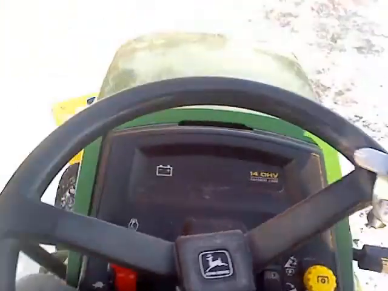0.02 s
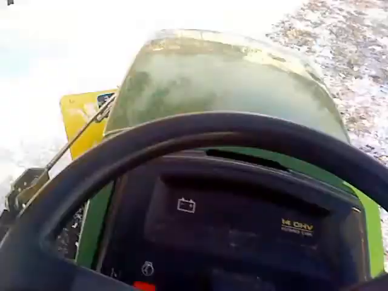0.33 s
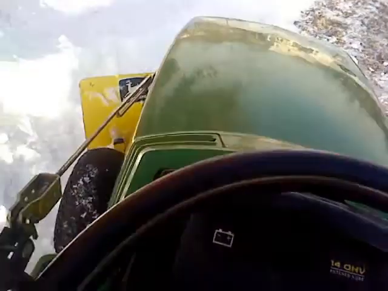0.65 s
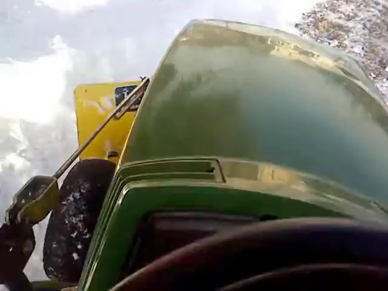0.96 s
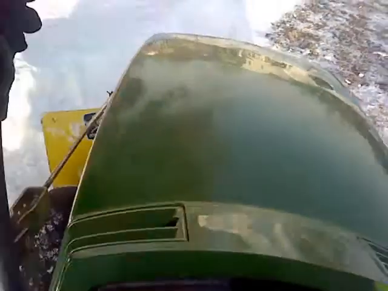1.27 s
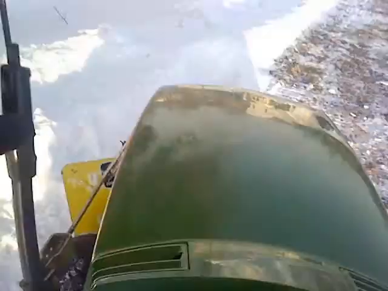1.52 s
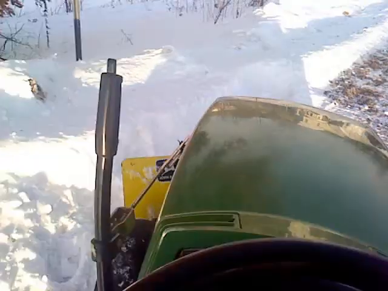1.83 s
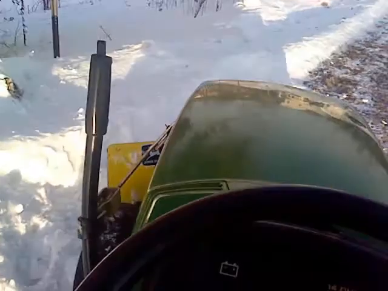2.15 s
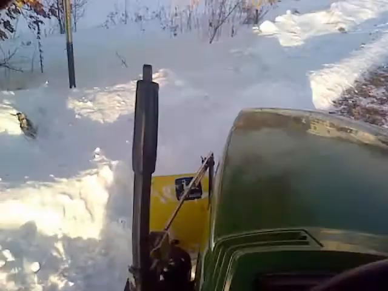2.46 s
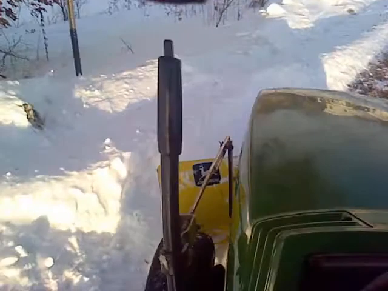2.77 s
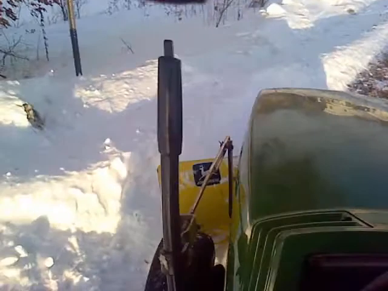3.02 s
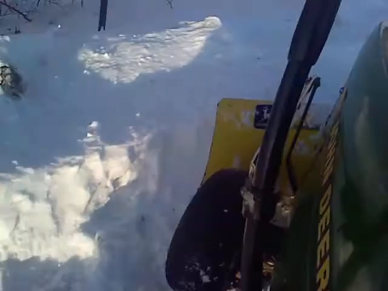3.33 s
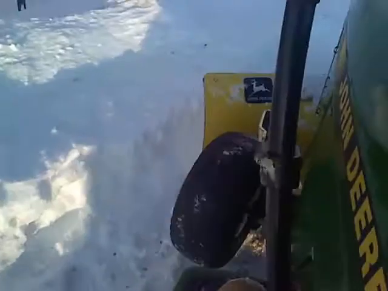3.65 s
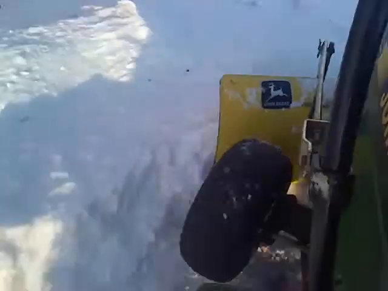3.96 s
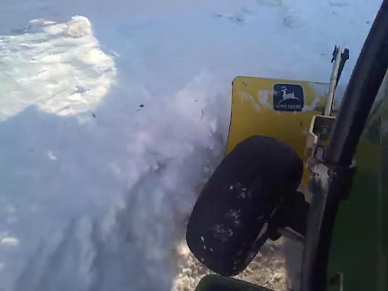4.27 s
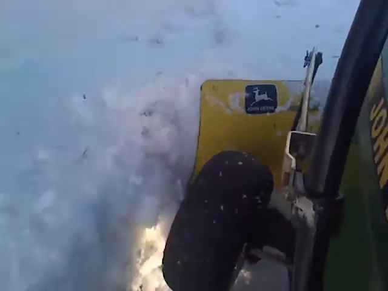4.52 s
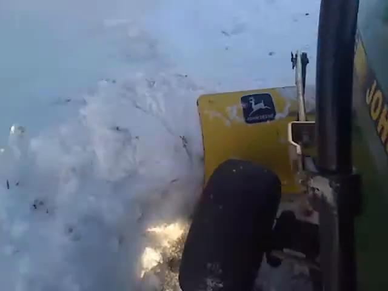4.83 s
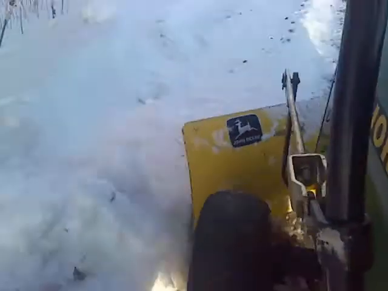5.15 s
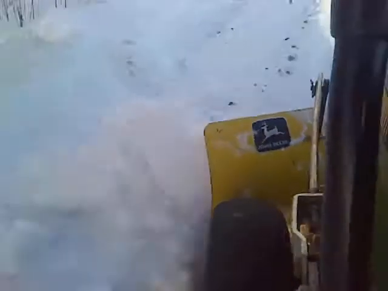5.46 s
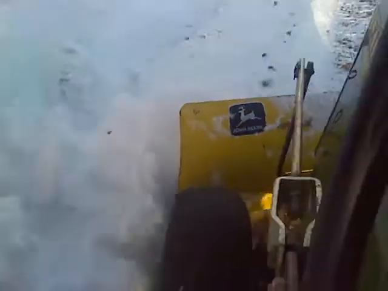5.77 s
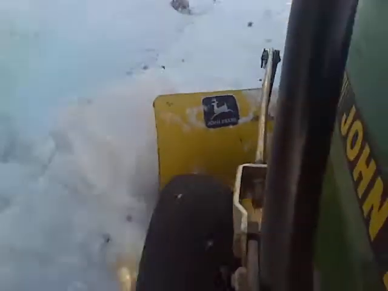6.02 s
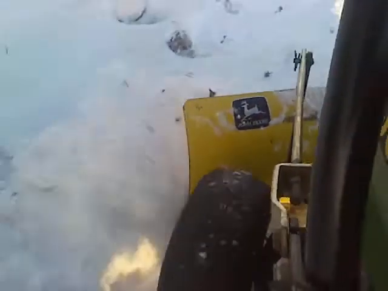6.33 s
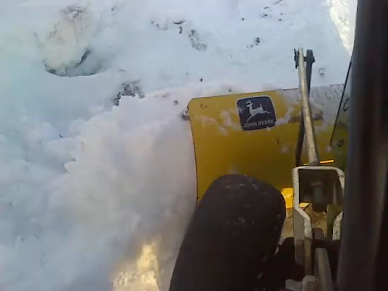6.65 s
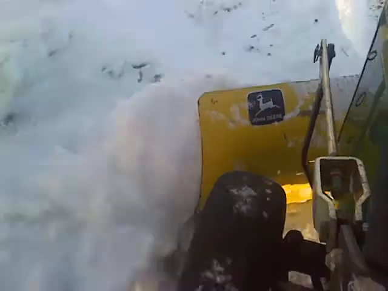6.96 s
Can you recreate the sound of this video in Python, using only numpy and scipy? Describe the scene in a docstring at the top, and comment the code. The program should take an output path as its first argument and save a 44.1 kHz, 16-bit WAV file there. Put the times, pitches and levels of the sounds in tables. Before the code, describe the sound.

Steady single-cylinder lawn tractor running with gear whine and clatter, straining briefly while its snowthrower churns snow with growing hiss and hollow booms.

```python
"""Lawn tractor throwing snow

A single-cylinder tractor with a front snowthrower, close up from the seat: the microphone starts over
the hood, then leans out and down beside the wheel. The exhaust thuds once every two crank turns and
barks when the load drags the speed down; gears whine and valves clatter. Snow hisses through the auger
and lumps boom in the chute. The narrow-band microphone overloads on the peaks."""
import sys
import numpy as np
from scipy import signal
from scipy.fft import rfft, irfft, next_fast_len
from scipy.io import wavfile
from scipy.ndimage import map_coordinates

SR = 44100
rng = np.random.default_rng(int(sys.argv[2]) if len(sys.argv) > 2 else 0)


def transcribe(u):
    """Save the signal u as a 16-bit wav file named by the first command-line argument.

    u: samples, shape (n,) or (channels, n), limited to [-1, 1]; the rate is SR.
    q: integer samples, one column per channel.
    """
    v = np.clip(np.atleast_2d(u).T, -1, 1)
    q = np.round(v * 32767).astype(np.int16)
    wavfile.write(sys.argv[1], SR, q)


N = 308259

# The speed the governor holds. Each row: time in seconds, firings per second.
GOVERNED_SPEED = [(0, 27.239), (2.3, 27.128), (3.8, 27.147), (6.99, 26.945)]
# Packed snow bogs the engine down.
# Each row: slowest moment in seconds, firings per second lost, build-up in seconds.
BOGS = [(2.948, 2.446, .204), (4.479, .324, .251), (4.949, 1.978, .206), (6.469, .415, .38)]
# Valve and piston knocks. Each row: place in the engine cycle from 0 to 1, relative level in dB.
KNOCKS = [(.0, -1), (.19, -2), (.49, -0.5), (0.641, -5.5), (.81, -1.5)]
# Snow entering the auger; it sets hiss, clatter and effort. Each row: time in seconds, level in dB.
SNOW_FEED = [(0, -31), (1.12, -29.5), (1.22, -26), (1.8, -33.5), (2.55, -30), (2.87, -32.5), (3.1, -26),
             (3.55, -27), (3.75, -22), (4.0, -25.5), (4.25, -20.5), (4.6, -24.5), (4.8, -20.5), (5.35, -17),
             (5.55, -20.5), (5.7, -15.5), (6.0, -16), (6.99, -15)]

# Whine over the hood, beside the wheel and from the snowthrower drive.
# Each row: multiple of the firing rate, relative level in dB.
HOOD_LINES = [(15, -12), (18, -13), (19, -13), (20, -5), (22, -9), (24, -6), (25, -8), (26, -10), (27, -13),
              (28, 0), (30, -5), (32, -8), (33, -14), (34, -3), (36, -11), (38, -11), (40, -5), (42, -8),
              (43, -11), (44, -7), (46, -10), (48, -12), (50, -14), (54, -7), (57, -13), (58, -13),
              (60, -13)]
WHEEL_LINES = [(14, -5), (16, -6), (17, -9), (20, -7), (21, -9), (24, 0), (30, -10), (36, 1), (40, -4),
               (42, -6), (50, -7), (54, -5), (56, -6)]
DRIVE_LINES = [(20, -11), (21, -7), (22, -5), (26, -12), (28, -8), (30, -3), (32, -9), (34, 1), (40, -8),
               (44, -4), (50, -8), (52, -9), (66, -9), (79, -8)]
MESH_LINES, MESH_DB = [(30, -10.5), (34, -2)], -23  # the drive's strongest lines and their level

# Bodies that ring. Each row: resonance in Hz, width in Hz, relative level in dB.
MUFFLER_MODES = [(186, 12, -1), (220.4, 23.6, 7), (260, 55, -1.5), (298, 27, -13.5), (387, 8.3, -12)]
SHEET_METAL_MODES = [(1557, 30, 4.5), (1716, 27, -2.5), (2087, 63, -7.5), (2380, 54, -17.5),
                     (3195, 270, -15.5)]
CHUTE_MODES = [(335, 110, -5), (381, 32, 0)]
AUGER_HOUSING_MODES = [(1300, 830, -6.5), (2250, 110, -3), (2160, 170, 2.5), (3440, 600, -10.5)]

# A few firings that knock harder than the rest, snow lumps in the chute and ice cracking on the housing.
# Each row: start in seconds, relative peak level in dB.
HARD_KNOCKS = [(1.488, -19), (2.074, -17), (2.185, -18), (2.337, -17), (2.706, -18), (3.683, -15),
               (4.05, -16)]
LUMPS = [(4.3, -8.5), (4.43, -9), (4.964, -10), (5.04, 2), (5.274, -4.5), (5.686, -7.5), (5.853, -7.5),
         (6.195, -9.5), (6.465, -8.5), (6.592, -3.5), (6.818, -4)]
ICE_CRACKS = [(4.202, -10), (4.226, -17), (4.343, -18), (5.05, -18), (5.288, -17), (5.86, -18)]

# The tone of the engine block, snow hiss, rumble and microphone. Each row: frequency in Hz, gain in dB.
BLOCK_SPECTRUM = [(150, -24.5), (350, -11), (520, 2.5), (800, 1.5), (1150, 1.5), (1400, -0.5), (1600, -6.5),
                  (1900, -9), (2700, -19), (3200, -18.5), (4500, -27.5)]
SNOW_SPECTRUM = [(200, -13.5), (500, -6.5), (1000, -10.5), (1550, -1), (1800, 2), (2000, 0.5), (2350, 2.5),
                 (2900, -3), (3400, -1), (4500, -8)]
RUMBLE_SPECTRUM = [(20, -26.5), (40, -15), (70, -2.5), (120, -2), (180, -4), (400, -19.5), (900, -46.5)]
MICROPHONE_RESPONSE = [(20, 0), (3350, 1.5), (3500, -3.5), (3750, -8), (4050, -15), (4350, -22.5),
                       (4700, -71.5), (5200, -110)]

# The microphone's moves. Each pair: halfway moment in seconds, rough duration in seconds.
PAST_STEERING_WHEEL, OFF_THE_HOOD, LEANING_OUT = (1.09, .12), (2.68, .2), (3.15, .14)
DOWN_TO_THE_WHEEL, BEHIND_THE_AUGER = (3.3, .88), (4.45, .4)

RECOVER_S, OVERSHOOT_SHARE, OVERSHOOT_AFTER_S = .105, .141, .216  # the governor catches up, runs fast
THROTTLE_LAG_S, EASE_AFTER_S = .035, .46  # after a bog: the throttle opens, later the machine runs light
THROTTLE_DROOP, STRAIN_DROOP = .55, 1.11  # firings per second lost: to open the throttle, to bark
LIGHT_FEED_DB = -30  # a thin layer of snow
GRIT_PER_S, GRIT_HZ, GRIT_LIFE_S = 55, 2098, .011


def exhaust(cycle, throttle, strain, at_wheel, level_db):
    """Each blowdown, a pressure pulse and a turbulent puff, rings the muffler; under strain it barks."""
    firing = strokes(cycle, 0, scatter_db=-0.1)
    # The rising piston pushes out the rest of the gas.
    scavenge = (0.033 + 0.48 * strain) * strokes(cycle, 0.222, scatter_db=-1.5)
    pulse = ring(firing + scavenge, MUFFLER_MODES)
    puff = ring(fading(firing, life=0.036) * noise(), MUFFLER_MODES)
    drone = 0.87 * np.maximum(throttle, 0) * ring(firing, [(213.9, 4.3, 0)])  # rings between firings
    # More gas roars longer and rings the pipe harder.
    roar = ring(fading(firing, life=0.065) * noise(), [(238, 20, -2.7), (325, 87, -0.83)])
    pipe = ring(firing, [(244.7, 5.9, -3.5), (317.4, 13, -10.5), (404, 3.8, -2.5)])
    bark = strain * (0.28 * roar + 0.81 * pipe)
    # The outlet sounds brighter from the side.
    outlet = .22 * at_wheel * ring(firing, [(271, 12, 0), (325, 12, 0), (378, 12, -1)])
    low_cut = signal.butter(4, 165, "high", fs=SR, output="sos")
    thuds = signal.sosfilt(low_cut, pulse + amp(-5.5) * puff + drone + bark + outlet)
    muffled = coloured(thuds, [(100, -1.5), (200, -1.5), (420, 1.5), (520, -14), (1500, -27)])
    return amp(level_db) * unit(muffled)


def droop(t):
    """Firings per second lost at times t: each bog builds slowly, clears fast and overshoots a little."""
    lost = np.zeros(N)
    for slowest, depth, build in BOGS:
        age = t - slowest
        sag = np.exp(-(age / np.where(age < 0, build, RECOVER_S)) ** 2)
        rebound = OVERSHOOT_SHARE * np.exp(-((age - OVERSHOOT_AFTER_S) / RECOVER_S) ** 2)
        lost += depth * (sag - rebound)
    return lost


def clatter(cycle, block_db, metal_db):
    """Valves and piston rattle block and sheet metal over the fan's rush; a few knocks hit harder."""
    blows = sum(amp(db) * strokes(cycle, place, scatter_db=2.5) for place, db in KNOCKS)
    rattle = unit(fading(blows, life=0.0064) * noise())
    fan = noise() * amp(0.44 * np.cos(4 * np.pi * cycle))
    block = amp(block_db) * unit(coloured(rattle + amp(-3) * fan, BLOCK_SPECTRUM))
    metal = amp(metal_db) * ring(rattle + 0.22 * noise(), SHEET_METAL_MODES)
    hard_knocks = amp(-2) * bursts(HARD_KNOCKS, rise=0.0025) * unit(coloured(noise(), BLOCK_SPECTRUM))
    return block + metal + hard_knocks


def whine(cycle, lines, level_db, waver_db, drift_rad):
    """Gear tones locked to the crankshaft crest together on the engine's knocks and waver a little."""
    tones = np.zeros(N)
    for order, db in lines:
        knocks = sum(amp(knock_db) * np.exp(-2j * np.pi * order * place) for place, knock_db in KNOCKS)
        phase = 2 * np.pi * order * cycle + np.angle(knocks) + drift_rad * wobble(14)
        tones += amp(db + waver_db * wobble(5)) * np.sin(phase)
    return amp(level_db) * unit(tones)


def intake(cycle):
    """With the throttle wide open, each suction stroke gulps air through the filter box."""
    gulp = fading(strokes(cycle, .5, scatter_db=-0.5), life=.02) * noise()
    return amp(-25) * ring(gulp, [(690, 72, 1), (850, 93, -4)])


def hood_slap(cycle):
    """Each firing jolts the hood: a short, hollow slap at close range."""
    jolt = fading(strokes(cycle, 0, scatter_db=.5), life=.0055) * noise()
    return amp(-29) * ring(jolt, [(324, 160, 0), (620, 230, -6), (1500, 240, -11)])


def snow_hiss(cycle, snow_db):
    """Crystals scour the auger housing in clumps, surging with each turn of the shaft."""
    grains = noise() * amp(0.92 * wobble(900))
    surge = amp(np.cos(4 * np.pi * cycle) + 1.3 * wobble(45) + .7 * wobble(12))
    return amp(snow_db + 2) * unit(coloured(grains * surge, SNOW_SPECTRUM))


def chute(snow_db):
    """Snow makes the chute drone; lumps boom in it and shake the frame; ice rings the housing."""
    def hollow():
        air = resonate(noise(), CHUTE_MODES)
        return unit(coloured(air, [(100, -17.5), (280, 6), (420, 6), (520, -10.5), (2000, -16.5)]))

    drone = amp(snow_db - 6 + 2 * wobble(14)) * hollow()
    booms = amp(-6) * bursts(LUMPS, rise=0.0086) * hollow()
    shake = amp(-18.5) * bursts(LUMPS, rise=0.017) * unit(coloured(noise(), BLOCK_SPECTRUM))
    cracks = bursts(ICE_CRACKS, rise=0.0039) * ring(noise(), AUGER_HOUSING_MODES)
    return drone + booms + shake + cracks


def grit(snow_db):
    """Gravel picked up with the snow pings the housing, each stone at its own pitch."""
    stones = rng.random((int(GRIT_PER_S * N / SR), 3))
    t = np.arange(SR // 16) / SR
    pings = np.zeros(N + len(t))
    for when, pitch, softness in stones:
        hz = GRIT_HZ * 2 ** (1.4 * (pitch - .5))
        ping = np.sin(2 * np.pi * hz * t) * np.exp(-t / GRIT_LIFE_S)
        pings[int(when * N):][:len(t)] += amp(-12 * softness) * ping
    return amp(snow_db - 8) * unit(pings[:N])


def rumble(level_db):
    """A low, even rumble behind the whole machine."""
    return amp(level_db) * unit(coloured(noise(), RUMBLE_SPECTRUM))


def amp(db):
    """Decibels to gain."""
    return 10 ** (np.asarray(db) / 20)


def unit(x):
    """Scale to rms 1."""
    return x / np.sqrt(np.mean(x ** 2) + 1e-20)


def noise():
    """White noise."""
    return rng.standard_normal(N)


def wobble(rate):
    """A smooth random curve, rate knots a second."""
    knots = rng.standard_normal(int(N * rate / SR) + 4)
    steps = np.arange(len(knots) * 10) / 10
    return np.interp(np.arange(N) * rate / SR, steps, map_coordinates(knots, [steps]))


def filtered(x, response):
    """x through a complex response of frequency."""
    size = next_fast_len(N + SR // 2)
    return irfft(rfft(x, size) * response(np.fft.rfftfreq(size, 1 / SR)), size)[:N]


def coloured(x, points):
    """x through a spectrum of (Hz, dB) points on a log axis."""
    hz, db = np.transpose(points)
    return filtered(x, lambda f: amp(np.interp(np.log(f + 1), np.log(hz), db)))


def resonate(x, modes):
    """x through a body with (Hz, width in Hz, dB) resonances."""
    return filtered(x, lambda f: sum(amp(db) * 1j * f * width / (hz * hz - f * f + 1j * f * width)
                                     for hz, width, db in modes))


def ring(x, modes):
    """The sound of a body driven by x, at rms 1."""
    return unit(resonate(x, modes))


def strokes(cycle, place, scatter_db):
    """One impulse of random size each time the engine passes a place in its cycle."""
    at = np.flatnonzero(np.diff(np.floor(cycle - place)) > 0)
    train = np.zeros(N)
    train[at] = amp(scatter_db * rng.standard_normal(256)[:len(at)])
    return train


def fading(train, life):
    """Each impulse becomes an exponential decay of the given life in seconds."""
    return signal.lfilter([1], [1, -np.exp(-1 / (life * SR))], train)


def bursts(rows, rise):
    """An envelope that swells for rise seconds and dies away at each (start, peak dB) row."""
    t = np.arange(N) / SR
    ages = [(np.maximum(t - start, 0) / rise, db) for start, db in rows]
    return sum(amp(db) * age * np.exp(1 - age) for age, db in ages)


def move(halfway, duration):
    """A microphone move: a smooth step from 0 to 1."""
    return .5 + .5 * np.tanh(2 * (np.arange(N) / SR - halfway) / duration)


def scene():
    """Snow feed and throttle set how hard everything works; the microphone's place sets the balance."""
    t = np.arange(N) / SR
    speed = np.interp(t, *np.transpose(GOVERNED_SPEED)) - droop(t)
    cycle = np.cumsum(speed) / SR - .016 * speed[0]  # counts firings, the first at 16 ms
    demand = droop(t - THROTTLE_LAG_S)
    throttle = np.tanh(demand / THROTTLE_DROOP)
    strain = np.tanh(np.maximum(demand, 0) / STRAIN_DROOP) ** 2
    eased_db = .5 * np.tanh(np.maximum(droop(t - EASE_AFTER_S), 0))
    snow_db = np.interp(t, *np.transpose(SNOW_FEED))
    feed_db = snow_db - LIGHT_FEED_DB

    # Where the microphone is, each from 0 to 1.
    over_hood = 1 - move(*OFF_THE_HOOD)
    close = over_hood * move(*PAST_STEERING_WHEEL)
    outside, at_wheel, at_auger = move(*LEANING_OUT), move(*DOWN_TO_THE_WHEEL), move(*BEHIND_THE_AUGER)

    effort_db = 2.5 * throttle + 0.092 * feed_db + 1.3 * strain - eased_db
    placement_db = 1.1 * close - 1.3 * at_wheel * (1 - at_auger)
    block_db = -24.5 + 0.33 * feed_db + 1.8 * over_hood + .5 * strain
    metal_db = -42 + 11 * close + 7 * outside + 8 * at_wheel - 3 * at_auger  # louder when in view
    engine = exhaust(cycle, throttle, strain, at_wheel, -21.5 + effort_db + placement_db)
    engine += strain * intake(cycle)
    engine += clatter(cycle, block_db, metal_db)
    engine += close * hood_slap(cycle)
    engine += over_hood * whine(cycle, HOOD_LINES, -20.5, waver_db=2.84, drift_rad=0.25)
    engine += at_wheel * whine(cycle, WHEEL_LINES, -24.5 - 5 * at_auger, waver_db=4.5, drift_rad=0.4)
    drive = at_wheel * whine(cycle, DRIVE_LINES, -37 + 0.97 * feed_db, waver_db=2.5, drift_rad=0.23)
    # Just past the edge of the hood, the drive's strongest lines reach the microphone first.
    drive += outside * (1 - at_wheel) * whine(cycle, MESH_LINES, MESH_DB, waver_db=2, drift_rad=0.25)
    background = rumble(-25.5 + 0.43 * snow_db - .8 * eased_db)
    snow = snow_hiss(cycle, snow_db) + grit(snow_db) + chute(snow_db - 0.92 * eased_db)
    return (engine + drive + snow + background)[None]


def record(dry):
    """One narrow-band microphone close to the machine; its clipped peaks spit treble."""
    clipped = np.clip(coloured(dry[0], MICROPHONE_RESPONSE), -.71, .71)
    return filtered(clipped, lambda hz: hz < 15900)[None]


dry = scene()
out = record(dry)
transcribe(out)
```